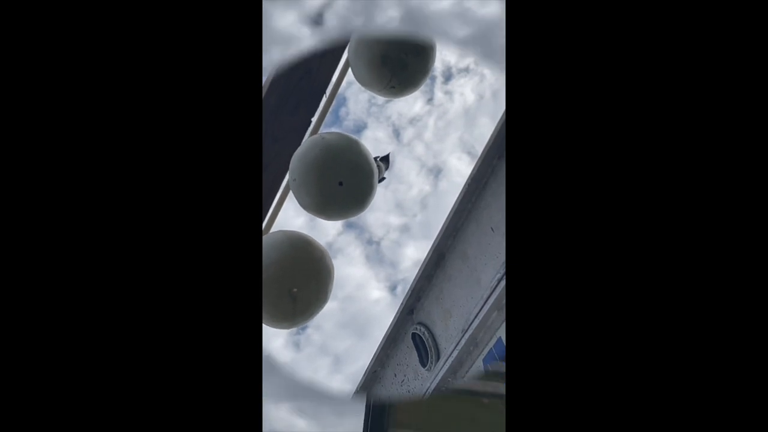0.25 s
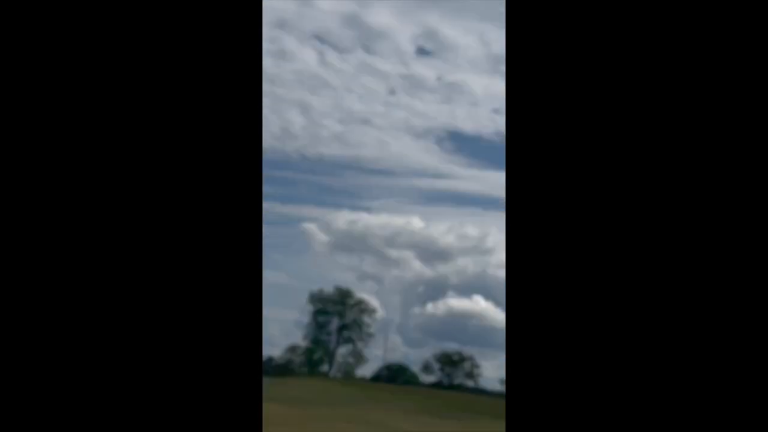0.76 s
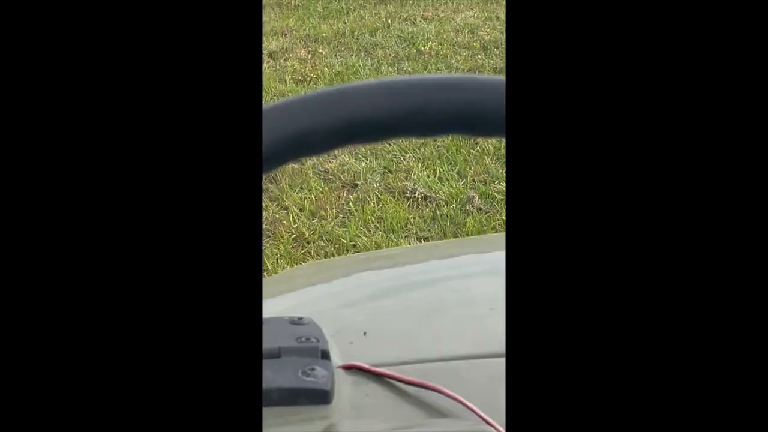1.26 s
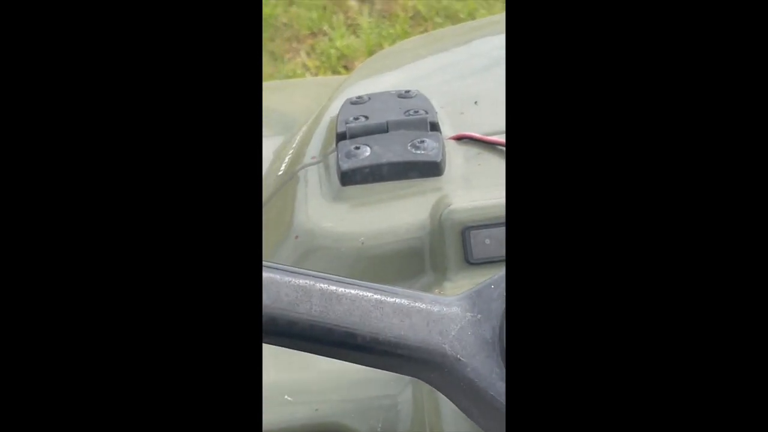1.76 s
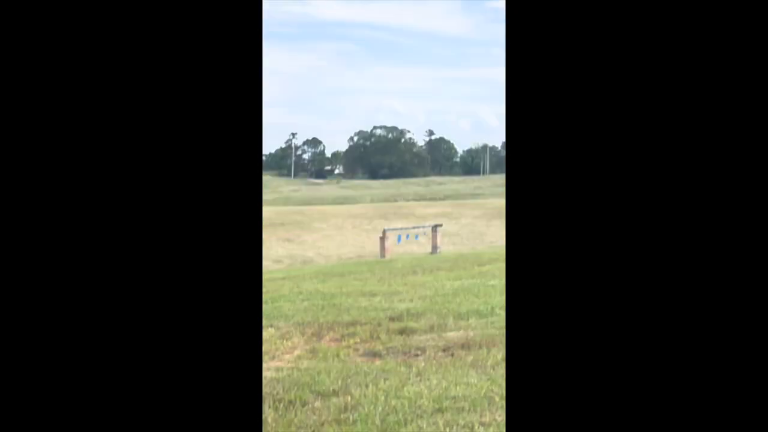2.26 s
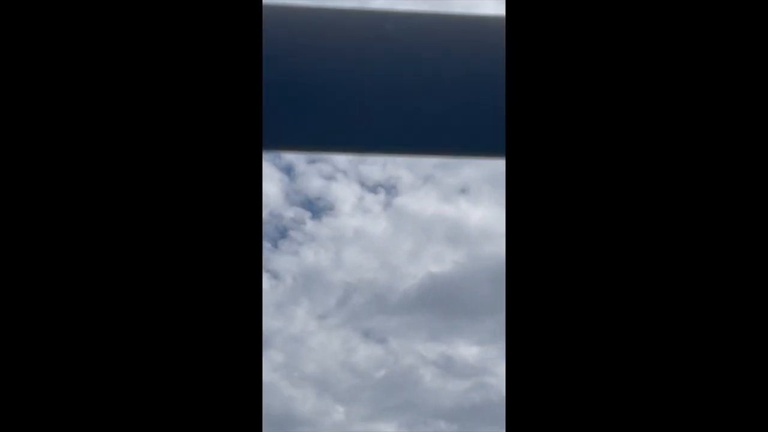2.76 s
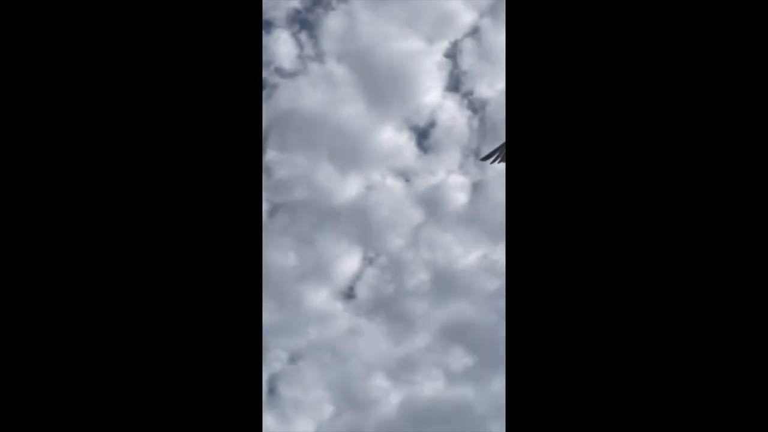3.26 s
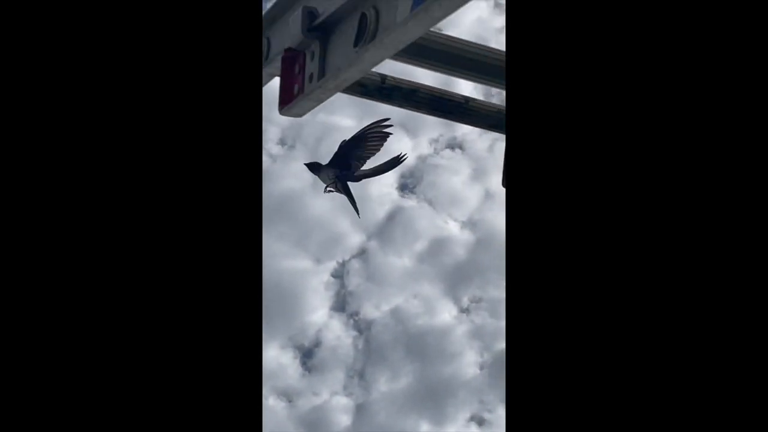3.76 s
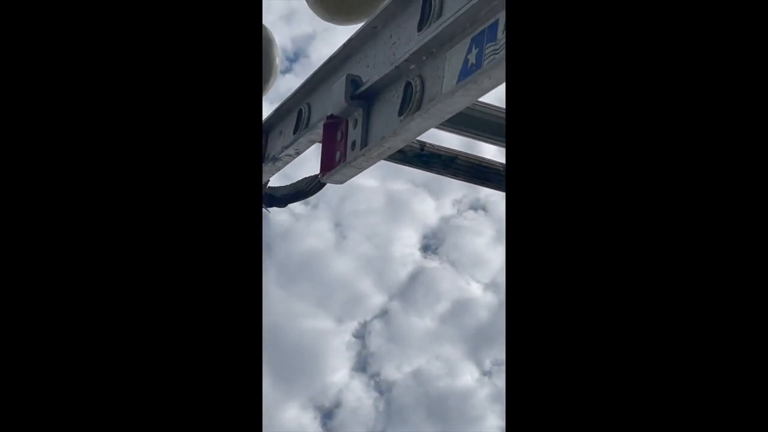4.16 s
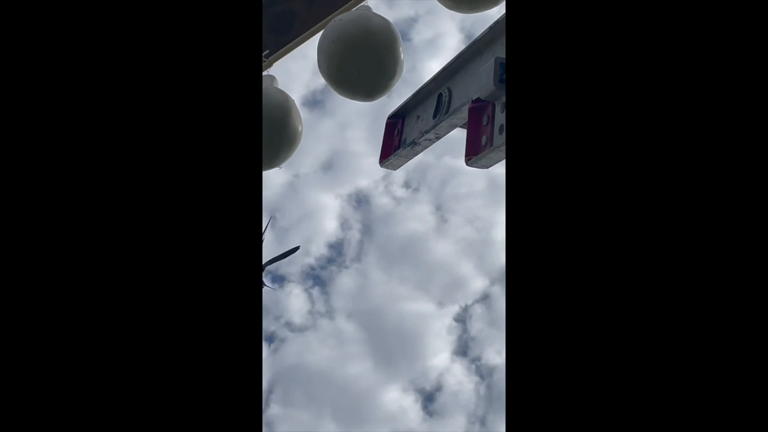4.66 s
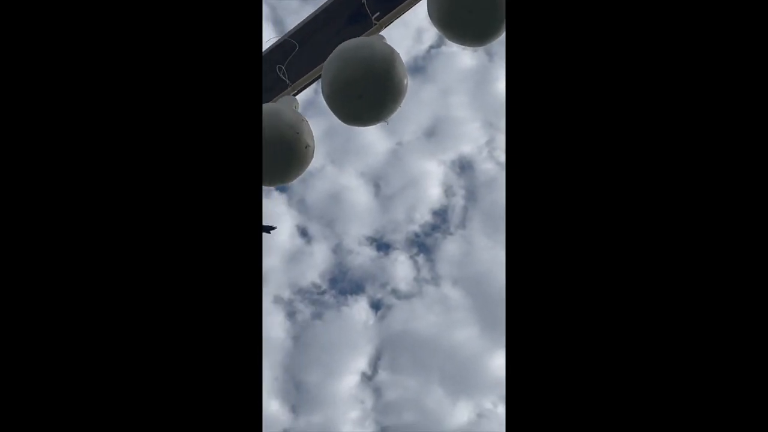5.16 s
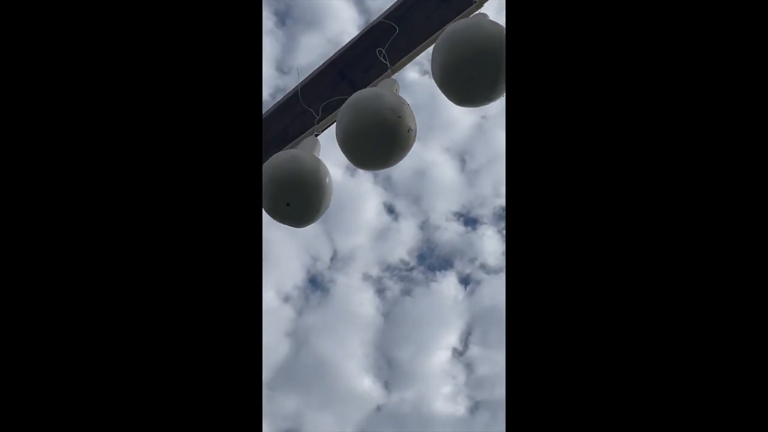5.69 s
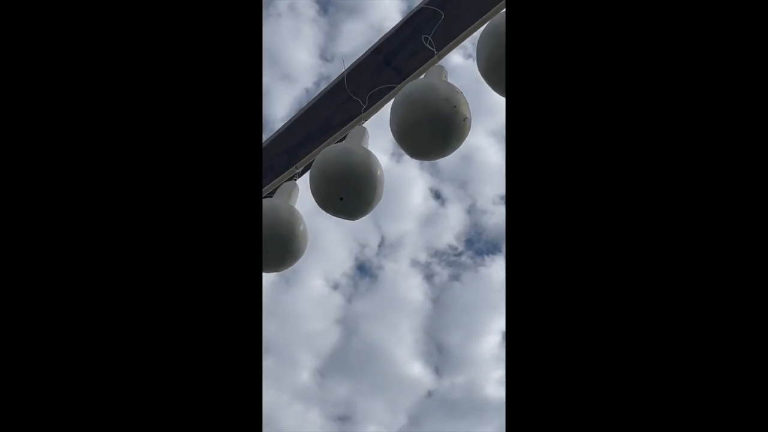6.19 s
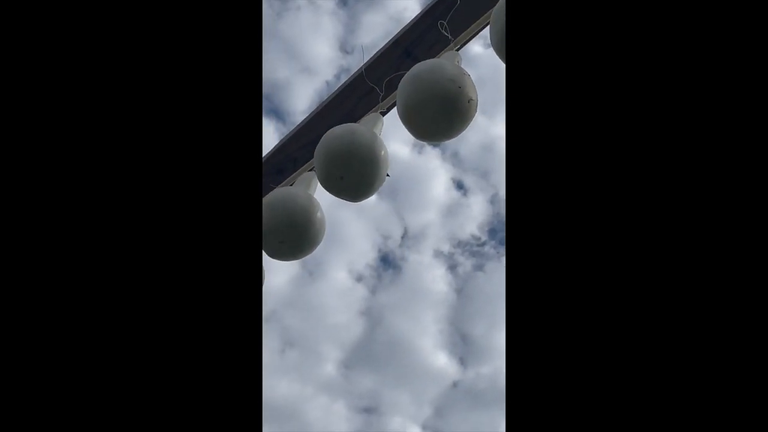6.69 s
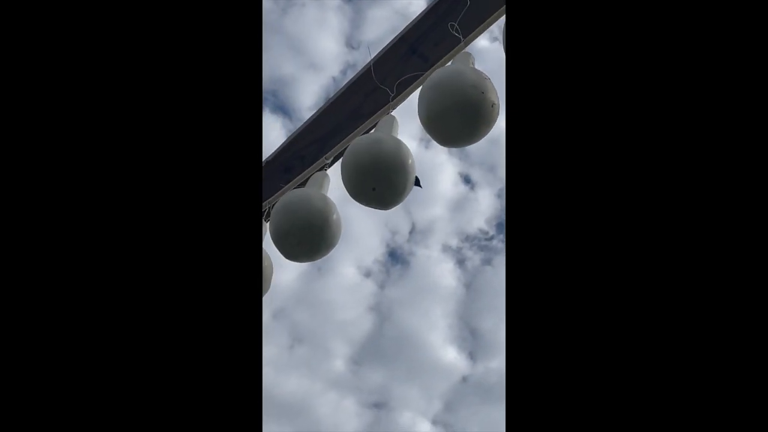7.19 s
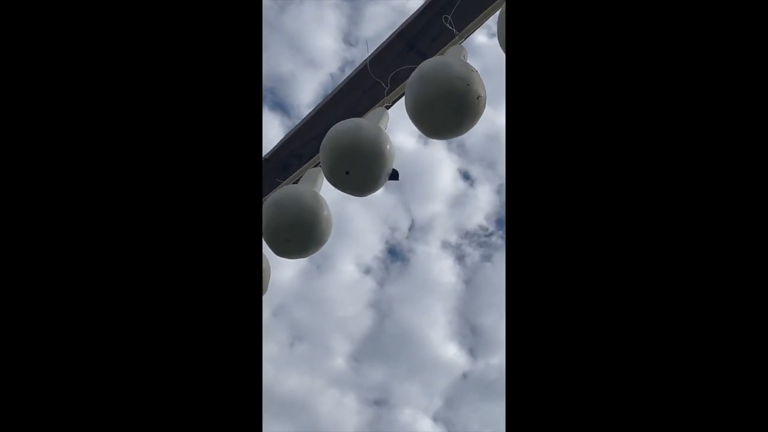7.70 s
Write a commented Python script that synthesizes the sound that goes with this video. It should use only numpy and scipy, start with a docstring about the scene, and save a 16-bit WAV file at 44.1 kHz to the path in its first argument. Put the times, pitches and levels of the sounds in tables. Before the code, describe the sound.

Open grassy field, stereo hand-held phone, purple martins near hanging gourds. Soft air hush and a thin, very high insect buzz continue beneath uneven low wind. Rolling trilled chirps, each about 0.15 s, arch up and fall at 0.0, 0.3, 0.8, 1.8 and a lower one at 2.15; harsher, shorter two-voiced chirps come at 0.7 and 1.6. Wind thumps hard around 0.7 and 2.6. Two loud, close, piercing trilled calls ring out at 2.8 and 4.1, with a faint diffuse echo from trees. A distant engine drones low from about 3.4 to 4.8. Small ticks and dull knocks scatter throughout, busiest 4.6-5.6. From 5.9 to 6.9, four quick falling calls, liquid double notes with descending two-voiced tails, accompany faint far whistles at 5.8-6.4. Birds then mostly stop; wind rumble and flutter swell until the end, with a tiny whistle near 7.8.

```python
"""In an open field, purple martins call around their hanging gourds: arched, trilled chirps, harsh two-voiced
chirps, two loud close calls, then falling two-voiced notes; each is a pair of gliding tones with overtones
or a single one. A far bird whistles thinly, an insect buzzes at a high pitch in the grass and an engine drones
far off, as pure tones, noise bands and wavering sines. Wind buffets a hand-held phone as filtered noise and
single pressure swings, small knocks ring as resonant bursts, and trees return a faint diffuse echo."""
import sys
import numpy as np
from scipy import signal
from scipy.fft import rfft, irfft
from scipy.io import wavfile
from scipy.ndimage import map_coordinates

SR = 44100
rng = np.random.default_rng(int(sys.argv[2]) if len(sys.argv) > 2 else 0)


def materialize(psi):
    """Save the field psi as 16-bit PCM at rate SR to the path in sys.argv[1].

    A 1-D psi becomes a single channel; in a 2-D psi each row is a channel.
    """
    bounded = np.clip(np.atleast_2d(psi).T, -1, 1)
    quanta = np.round(bounded * 32767).astype(np.int16)
    wavfile.write(sys.argv[1], SR, quanta)


N = 350154
TIME = np.arange(N) / SR

# colour of the overtones in chirps and loud calls: hz, gain_db
OVERTONES = [(3500, -0.5), (5200, -9.5), (6200, 1.5), (7600, 4), (9300, -7.5), (11600, 2), (13000, -5),
             (15500, 0.5)]


def undb(db):
    """The decibel is logarithmic: 20 dB is a factor of ten in amplitude."""
    return 10 ** (np.asarray(db) / 20)


def unit(x):
    """Normalisation to unit power: scale to rms 1."""
    return x / np.sqrt(np.mean(x ** 2))


def curve(rows, t=TIME):
    """Linear interpolation in time of each column after the first."""
    s, *columns = np.transpose(rows)
    return [np.interp(t, s, c) for c in columns]


def colour(x, points):
    """Linear filtering: multiply the spectrum by a gain curve through points of hz, gain_db."""
    hz, db = np.transpose(points)
    f = np.fft.rfftfreq(len(x), 1 / SR)
    gain = undb(np.interp(np.log(f + 1), np.log(hz), db))
    return irfft(rfft(x) * gain, len(x))


def walk(rate, size=N):
    """Smooth random wander: a curve with rate random knots a second, spread near 1."""
    place = np.arange(size) * rate / SR
    return map_coordinates(rng.standard_normal(16384), [place], order=2, mode="wrap")


def add(track, start, sound):
    """Superposition: mix a sound into a track at a time in seconds."""
    i = max(int(start * SR), 0)
    track[i:i + len(sound)] += sound[:N - i]


def echo(x, db, rise_s, t60):
    """Diffuse reflection: convolution with noise that builds up, under a decay of 60 dB in t60 seconds."""
    t = TIME[:SR]
    shape = np.clip((t - .002) / rise_s, 0, 1) * undb(-60 * t / t60)
    response = unit(shape) * rng.standard_normal(SR) / np.sqrt(SR)
    return undb(db) * signal.fftconvolve(x, response)[:N]


def arch(start, length, top_hz, rise_hz, fall_hz, db, swell_db, crest, late, attack_s, release_s,
         attack_db=14, release_db=14):
    """Pitch and level contour of a note as rows of s, hz, level_db: rise to a crest, fall and level off."""
    u = np.linspace(0, 1, 128)
    crest = np.clip(crest, .01, .9)
    before = np.maximum(1 - u / crest, 0)
    after = np.maximum((u - crest) / (1 - crest), 0)
    hz = top_hz - rise_hz * before ** 2 - fall_hz * np.sin(np.pi / 2 * after ** late) ** 2
    attack = attack_db * np.maximum(1 - u * length / attack_s, 0) ** 2
    release = release_db * np.maximum(1 - (1 - u) * length / release_s, 0) ** 2
    level_db = db + swell_db * (u - .5) - attack - release
    return np.column_stack([start + u * length, hz, level_db])


def add_trill(track, rows, trill_hz, swing_hz, throb, rough_hz, creak, burst_hz=0, settle_s=0.012, fade_s=0.0012):
    """Frequency and amplitude modulation: one side of the syrinx, a near sine shaken by a fast trill."""
    start, end = rows[0][0], rows[-1][0]
    t = np.arange(start, end, 1 / SR)
    hz, db = curve(rows, t)
    beat = 2 * np.pi * np.cumsum(trill_hz * (1 + 0.025 * walk(46, len(t)))) / SR
    # a burst of extra swing at the start settles
    swing_hz = swing_hz + burst_hz * np.exp((start - t) / settle_s)
    # each beat flicks the pitch up quickly and lets it sink
    hz = hz + swing_hz * (np.sin(beat) + 0.17 * np.sin(2 * beat))
    hz = hz + rough_hz * walk(700, len(t))
    # the tone is weakest near the top of each flick
    depth = np.clip(throb * (1 + 0.23 * walk(110, len(t))), 0, 1)
    pulse = 1 - depth * np.sin(beat + .5)
    # once a beat the membrane rattles briefly, which jitters the phase
    rattle = creak * ((1 - np.sin(beat)) / 2) ** 4 * walk(4500, len(t))
    gate = np.clip(np.minimum(t - start, end - t) / fade_s, 0, 1)
    size = unit(pulse * undb(walk(90, len(t)))) * undb(db) * gate
    phase = 2 * np.pi * np.cumsum(hz) / SR + rattle
    add(track, start, np.sqrt(2) * size * np.exp(1j * phase))


def glides(notes, bend, rough_hz, flicker_db, fade_db=0):
    """Exponential glide: pure notes that change pitch fast at first and then ever more slowly."""
    track = np.zeros(N, complex)
    for start, length, from_hz, to_hz, db in notes:
        u = np.linspace(0, 1, max(int(length * SR), 64))
        progress = (1 - np.exp(-bend * u)) / (1 - np.exp(-bend))
        hz = from_hz + (to_hz - from_hz) * progress + rough_hz * walk(1036, len(u))
        level_db = db - fade_db * (u - .5) + flicker_db * walk(258, len(u))
        swell = np.abs(np.sin(np.pi * u ** 1.2)) ** 0.4 * undb(level_db)
        add(track, start, np.sqrt(2) * swell * np.exp(2j * np.pi * np.cumsum(hz) / SR))
    return track


def throat(tone, resonance, second_db, third_db, fourth_db, rasp_db, blur=.5):
    """Nonlinear distortion: blurred overtones, sum tones where two voices overlap, and a little rasp."""
    size = np.abs(tone)
    turn = np.exp(1j * (np.angle(tone) + blur * walk(900) / 2))
    harmonics = undb(second_db) * turn ** 2 + undb(third_db) * turn ** 3 + undb(fourth_db) * turn ** 4
    overtones = size * harmonics.real
    rasp = unit(colour(rng.standard_normal(N), [(800, -22), (2000, -3.5), (3000, 10.0), (4600, -12),
                                                (6500, 0), (12000, -2.0), (15500, -22.5)]))
    return tone.real + colour(overtones + undb(rasp_db) * size * rasp, resonance)


def field(trim_db=3):
    """Broadband turbulence noise: the soft, wide hush of air over grass and distant trees."""
    # spectrum: hz, relative_db
    field_spectrum = [(150, -14), (300, -0.5), (540, -4.5), (820, -4.5), (1700, -9), (3700, -16),
                      (5500, -27), (7500, -37.5), (12000, -51), (15500, -38.5)]
    # level before the trim: s, level_db
    field_level = [(.1, -69.5), (.85, -59.5), (1.4, -64.5), (2.0, -65), (2.3, -61.5), (2.7, -64.5),
                   (3.05, -62), (4.0, -66.5), (6.2, -67), (7.94, -67)]
    # stereo width, side against mid: hz, gain_db
    field_side = [(250, -13), (520, -3), (1000, -5.5), (3000, -11.5), (8000, -12.5)]
    level_db, = curve(field_level)
    mid, side = (unit(colour(rng.standard_normal(N), field_spectrum)) * undb(1.0 * walk(7.8))
                 for _ in range(2))
    return undb(level_db + trim_db) * (mid + colour(side, field_side) * np.array([[1], [-1]]))


def drone():
    """Line spectrum: low sines of an engine far away, wavering in pitch and level."""
    # level of the engine: s, level_db
    drone_level = [(3.2, -70.5), (3.45, -56.5), (3.85, -48.5), (4.2, -46), (4.45, -55.5), (4.8, -59.5),
                   (5.1, -77)]
    # its spectral lines: hz, relative_db
    drone_lines = [(91.5, -1), (220, -12), (240, -19)]
    level_db, = curve(drone_level)
    lines = np.zeros(N)
    for hz, db in drone_lines:
        phase = 2 * np.pi * np.cumsum(hz * (1 + 0.016 * walk(4.5))) / SR
        lines += undb(db + 2 * walk(1.8)) * np.sin(phase)
    return np.sqrt(2) * undb(level_db) * lines


def insect(trim_db=1, stroke_width=0.23, stroke_hz=66.2):
    """Stridulation: each wing stroke drags a scraper over a file, and the buzz climbs through the stroke."""
    # spectral weighting of the buzz: hz, gain_db
    insect_spectrum = [(6800, -36), (8300, 1), (9100, -6.5), (9700, -4.5), (10300, -7), (10950, -4.5),
                       (11350, -24), (12000, -30.5)]
    # level before the trim: s, level_db
    insect_level = [(.3, -69), (.65, -63), (1.2, -66.5), (3.5, -65), (4.0, -67), (7.94, -67)]
    level_db, = curve(insect_level)
    stroke = np.cumsum(stroke_hz * (1 + .008 * walk(10))) / SR
    buzz = np.zeros(N)
    # three noise bands peak in turn, each at its fraction of the stroke
    for hz, moment in [(9250, .25), (10250, 0.51), (10900, 0.6)]:
        ring = unit(colour(rng.standard_normal(N), [(hz - 1200, -30), (hz, 0), (hz + 1200, -30)]))
        turn = 2 * np.pi * (stroke - moment)
        buzz += ring * np.exp((np.cos(turn) - 1) / (2 * np.pi * stroke_width) ** 2)
    return unit(colour(buzz, insect_spectrum)) * undb(level_db + trim_db)


def eddy(hz, cycles=1.23, sink=0.11):
    """Vortex passage: the port feels a pressure swing of a cycle or two that sinks in pitch."""
    turns = TIME[:8192] * hz
    age = turns / cycles
    envelope = (2 * age) ** 2 * np.exp(2 - 4 * age)
    return envelope * np.sin(2 * np.pi * turns * (1 + sink) / (1 + sink * np.sqrt(age)))


def wind(rumble_trim_db=1.5, flutter_trim_db=-3.5, patchy_db=4.5, lumpy_db=1.5, eddy_db=3, eddy_hz=260,
         spread_db=3, eddy_count=110, gust_flutter_db=-24.5):
    """Turbulent pressure: deep rumble and patchy flutter swell in gusts, under small eddies and strong buffets."""
    # steady breeze before the trims: s, rumble_db, flutter_db
    breeze = [(0, -52.5, -57), (1.05, -47, -54.5), (1.5, -52, -63), (2.2, -46.5, -52.5), (3.0, -56, -53.5),
              (3.3, -55.5, -51.5), (3.65, -56, -47), (4.3, -48, -55), (4.65, -59, -59.5), (5.0, -58, -58),
              (5.45, -46, -55.5), (6.0, -54, -57.5), (6.17, -44.5, -46.5), (7.0, -40.5, -46),
              (7.7, -37.5, -41.5), (7.94, -46.5, -52)]
    # gusts, each a single swell: peak_s, length_s, rumble_db
    gusts = [(0.66, 0.14, -34.5), (2.325, 0.19, -39), (2.59, 0.23, -32), (2.821, 0.066, -40),
             (4.915, 0.033, -41.5), (5.254, 0.23, -42.5), (5.703, 0.31, -38), (6.598, 0.21, -38)]
    # the strongest buffets: start_s, level_db, pitch_hz
    buffets = [(0.676, -19.5, 73), (2.308, -35.5, 483), (2.324, -35.5, 387), (2.571, -21, 72),
               (2.656, -27, 159), (3.098, -32.5, 102), (3.215, -35, 100), (5.159, -31, 81),
               (5.221, -25, 102.5), (5.357, -26.5, 92), (5.642, -23.5, 53), (6.508, -28, 201),
               (6.625, -31.5, 294), (6.954, -33, 318), (7.098, -28.5, 302), (7.177, -28.5, 312),
               (7.329, -23.5, 111.4), (7.36, -29, 265), (7.538, -24, 208), (7.821, -19.5, 235)]
    # spectra of the large and the small turbulence: hz, relative_db
    rumble_spectrum = [(12, -42.5), (20, -9), (44, 2), (73, 3), (93, 2.5), (150, -6), (255, -23.5),
                       (400, -37), (520, -54), (880, -120)]
    flutter_spectrum = [(100, -18.5), (170, -2.5), (240, 1.5), (330, -7.5), (480, -22), (700, -35),
                        (1200, -75)]
    # stereo width, side against mid: hz, gain_db
    wind_side = [(30, -7.5), (70, -20), (140, -20.5), (300, -13.5)]

    rumble_db, flutter_db = curve(breeze)
    gust = sum(undb(db) * np.exp(-(2 * (TIME - s) / length) ** 2) for s, length, db in gusts)
    rumble = np.hypot(undb(rumble_db + rumble_trim_db), gust) * undb(lumpy_db * walk(22))
    # a gust brings flutter in proportion to its rumble
    flutter = np.hypot(undb(flutter_db + flutter_trim_db), gust * undb(gust_flutter_db))

    def turbulence():
        """Superposed scales of turbulence: one channel of rumble and flutter noise."""
        deep = unit(colour(rng.standard_normal(N), rumble_spectrum))
        patchy = rng.standard_normal(N) * undb(patchy_db * walk(70))
        return rumble * deep + flutter * unit(colour(patchy, flutter_spectrum))

    mid, side = turbulence(), turbulence()
    places = rng.integers(0, N, eddy_count)
    for i, (size, octaves) in zip(places, rng.standard_normal((eddy_count, 2))):
        level = flutter[i] * undb(eddy_db + spread_db * size)
        add(mid, i / SR, level * eddy(eddy_hz * 2 ** (.4 * octaves)))
    for start, db, hz in buffets:
        add(mid, start, undb(db) * eddy(hz))
    return mid + colour(side, wind_side) * np.array([[1], [-1]])


def knocks():
    """Damped resonance: brief decaying noise bursts excite one broad mode each."""
    # small knocks and ticks: start_s, peak_db, ring_hz, width_hz, t60_s
    knock_rows = [(1.185, -47, 3500, 5070, 0.0067), (2.758, -41.5, 3250, 3000, 0.014),
                  (3.359, -41.5, 1000, 1202, 0.054), (4.093, -40, 3030, 1516, 0.038),
                  (4.565, -48, 680, 297, 0.032), (4.689, -54, 2900, 403, 0.016),
                  (4.794, -39.5, 2530, 7200, 0.092), (4.798, -37.5, 250, 70.9, 0.17),
                  (5.201, -40.5, 570, 90, 0.046), (5.203, -51, 1305, 890, 0.039),
                  (5.283, -49, 580, 130, 0.07), (5.364, -40, 2060, 294, 0.061),
                  (5.565, -47.5, 3440, 5090, 0.11), (5.597, -46, 4300, 5010, 0.09),
                  (6.738, -50, 2320, 1470, 0.017), (7.852, -51.5, 3300, 2510, 0.045)]
    track, t = np.zeros(N), TIME[:8192]
    for start, db, hz, width_hz, t60 in knock_rows:
        burst = rng.standard_normal(len(t)) * undb(-60 * t / t60)
        ring = signal.lfilter(*signal.iirpeak(hz, hz / min(width_hz, SR / 4), fs=SR), burst)
        # low-pass above the resonance
        ring = signal.lfilter(*signal.butter(2, min(1.4 * hz, SR / 3), fs=SR), ring)
        add(track, start, undb(db) * ring / np.abs(ring).max())
    return track


def far_whistles():
    """Pure tones: thin gliding whistles of a bird far off, without overtones."""
    # whistles: start_s, length_s, from_hz, to_hz, level_db
    whistles = [(5.84, 0.038, 4050, 4100, -72.5), (6.198, 0.17, 4300, 4215, -65.5),
                (6.39, 0.042, 4400, 4350, -72.5), (7.77, 0.02, 2600, 2235, -64.5)]
    return glides(whistles, bend=0.74, rough_hz=12, flicker_db=3.5).real


def falling_calls(low_db=4.5, last_db=-8, last_hz=2080):
    """Two sources in one syrinx: one side sweeps down in two notes, then dips and lifts under the other's tail."""
    # falling calls, a sweep, a second note and a two-voiced tail: start_s, sweep_s, from_hz, to_hz,
    # sweep_db, second_s, second_db, tail_s, tail_db, lag_s of the tail's low note
    falling = [(5.89, 0.07, 5620, 2630, -63.5, 0.021, -49, 0.15, -65, 0.097),
               (6.238, 0.022, 3230, 2676, -47, .024, -39, 0.1, -55, .024),
               (6.509, .034, 3565, 2610, -38.5, 0.024, -38.5, 0.079, -54, 0.015),
               (6.76, .026, 4390, 3230, -43, .030, -38.5, 0.12, -46.5, 0.018)]
    # short notes that announce a falling call: start_s, level_db
    pickups = [(6.213, -53), (6.487, -43.5)]
    # mellow overtone resonance: hz, gain_db
    mellow = [(2000, -2), (3600, 6.5), (4200, -9), (5000, 8.5), (6000, 1), (7000, -17), (9500, -31),
              (12500, -11), (15500, 12)]
    pickup_s, pickup_from_hz, pickup_to_hz = .022, 3500, 2730
    gap_s = 0.0012  # between a sweep and its second note
    step_hz, landing_hz = 221, 2074  # the second note starts a step below the sweep's end and lands here
    overlap_s = 0.0058  # of the tail with the second note
    held_from_hz, held_to_hz = 3240, 2340
    low_from_hz, low_to_hz, low_s = 2250, 1842, .046

    sweeps = [(start, pickup_s, pickup_from_hz, pickup_to_hz, db) for start, db in pickups]
    held, lows = [], []
    for start, sweep_s, from_hz, to_hz, sweep_db, second_s, second_db, tail_s, tail_db, lag_s in falling:
        second = start + sweep_s
        tail = second + second_s - overlap_s
        low = tail + lag_s
        sweeps.append((start, sweep_s - gap_s, from_hz, to_hz, sweep_db))
        sweeps.append((second, second_s, to_hz - step_hz, landing_hz, second_db))
        held.append((tail, tail_s, held_from_hz, held_to_hz, tail_db))
        lows.append((low, low_s, low_from_hz, low_to_hz, tail_db + low_db))
        # the low voice lifts to a last note of steady pitch
        lows.append((low + low_s, tail_s - lag_s - low_s, last_hz, last_hz, tail_db + last_db))
    tone = glides(sweeps, bend=1.1, rough_hz=30, flicker_db=3.5)
    tone += glides(held, bend=4.2, rough_hz=45, flicker_db=4, fade_db=9.5)
    tone += glides(lows, bend=1.6, rough_hz=35, flicker_db=3.0, fade_db=3.0)
    # the strong second harmonic is heard as a clear octave
    return throat(tone, mellow, second_db=-16.0, third_db=-31, fourth_db=-28, rasp_db=-18.5, blur=.2)


def harsh_chirps(lag_s=0.023, overhang_s=0.0081):
    """Beating of two voices: the lower enters later, takes over and outlasts the upper."""
    # harsh chirps: start_s, length_s, upper_hz, upper_fall_hz, upper_db, lower_hz, lower_fall_hz, lower_db
    harsh = [(.683, 0.087, 4120, 404, -36.5, 3350, 520, -40.5),
             (1.602, 0.087, 4110, 99, -36.5, 3560, 786, -37.5)]
    tone = np.zeros(N, complex)
    for start, length, upper_hz, upper_fall_hz, upper_db, lower_hz, lower_fall_hz, lower_db in harsh:
        upper = arch(start, length, upper_hz, 216, upper_fall_hz, upper_db, swell_db=-3.0,
                     crest=0.252, late=1.41, attack_s=0.037, release_s=0.028)
        lower = arch(start + lag_s, length - lag_s + overhang_s, lower_hz, 0, lower_fall_hz, lower_db,
                     swell_db=19.5, crest=0.045, late=1.0, attack_s=0.0042, release_s=0.029)
        add_trill(tone, upper, trill_hz=162.7, swing_hz=152, throb=0.46, rough_hz=65, creak=0.025)
        add_trill(tone, lower, trill_hz=175.7, swing_hz=110, throb=0.16, rough_hz=77.5, creak=0.064)
    return throat(tone, OVERTONES, second_db=-27.5, third_db=-24.5, fourth_db=-35, rasp_db=-18.5)


def chirps(from_hz=2850, flick_db=-15, flick_s=.011):
    """Frequency-modulated arches: trilled chirps from the gourds, each led in by a soft upward flick."""
    # chirps: start_s, length_s, top_hz, rise_hz, fall_hz, late (exponent delaying the fall), level_db,
    # swell_db, trill_hz, swing_hz, throb (0-1), lead_s of the flick, flick_hz it reaches
    chirp_rows = [(.010, 0.15, 3594, 520, 875, 1.48, -42, 15.5, 163.3, 180, 0.32, 0.0016, 3060),
                  (0.313, .155, 3628, 233, 883, 1.23, -34.5, 9, 180.5, 133, .4, .019, 3050),
                  (0.826, 0.17, 3544, 96, 776, 1.58, -31.5, -1, 170, 124, 0.4, .005, 4000),
                  (1.772, 0.15, 3590, 254, 768, 1.9, -35, 4, 162.3, 115, 0.5, .009, 3820),
                  (2.155, 0.15, 3230, 69.8, 640, 2.44, -32.5, 4.5, 178, 140, 0.13, .004, 2960)]
    tone = np.zeros(N, complex)
    for (start, length, top_hz, rise_hz, fall_hz, late, db, swell_db,
         trill_hz, swing_hz, throb, lead_s, flick_hz) in chirp_rows:
        flick = (start - lead_s, flick_s, from_hz, flick_hz, db + flick_db)
        tone += glides([flick], bend=0.63, rough_hz=90, flicker_db=4)
        note = arch(start, length, top_hz, rise_hz, fall_hz, db, swell_db, crest=.33, late=late,
                    attack_s=.016, release_s=0.032, attack_db=12)
        add_trill(tone, note, trill_hz, swing_hz, throb, rough_hz=36, creak=.025, burst_hz=240)
    return throat(tone, OVERTONES, second_db=-28.0, third_db=-27.5, fourth_db=-51, rasp_db=-39.5, blur=0.37)


def loud_calls(sum_db=-8, lag_s=.031, lower_hz=3040, lower_fall_hz=503):
    """Intermodulation: close calls with a slower, wider trill over a weak pulsing second voice."""
    # loud calls in flight: start_s, length_s, top_hz, fall_hz, level_db, swell_db, trill_hz, lower_db
    loud = [(2.772, 0.12, 3896, 372, -20, 0, 137.6, -45), (4.109, 0.12, 3999, 452, -17.5, -4, 137.8, -40)]
    main, second = np.zeros((2, N), complex)
    for start, length, top_hz, fall_hz, db, swell_db, trill_hz, lower_db in loud:
        upper = arch(start, length, top_hz, 140, fall_hz, db, swell_db, crest=0.18, late=0.92,
                     attack_s=.07, release_s=.055, attack_db=9, release_db=10.5)
        lower = arch(start + lag_s, length - lag_s, lower_hz, 0, lower_fall_hz, lower_db,
                     swell_db=10.5, crest=0.025, late=0.99, attack_s=.015, release_s=0.015)
        add_trill(main, upper, trill_hz, swing_hz=185, throb=0.28, rough_hz=35, creak=0.066, burst_hz=200)
        add_trill(second, lower, trill_hz, swing_hz=200, throb=0.89, rough_hz=100, creak=0.11)
    # the two voices modulate each other, which gives a tone at the sum of their pitches
    sum_tone = undb(sum_db) * (second * np.exp(1j * np.angle(main))).real
    call = throat(main + second, OVERTONES, second_db=-31.5, third_db=-29.0, fourth_db=-30.5,
                  rasp_db=-31, blur=0.97)
    # the short windpipe and open beak radiate less below 2.5 kHz
    return colour(call + sum_tone, [(1000, -5.5), (1900, -4.5), (2500, 0)])


def scene(close_db=-11.5):
    """Superposition of sources: martins in the open, with insect, knocks, wind, engine and background."""
    background = field() + drone() + insect() + wind() + knocks()
    perched = far_whistles() + falling_calls() + harsh_chirps() + chirps()
    close = loud_calls()
    # short scatter off the rack and ladder
    birds = perched + close + echo(perched + close, db=-8.0, rise_s=0.00084, t60=0.054)
    # birds close to the phone send less to the trees than their loudness suggests
    to_trees = perched + undb(close_db) * close
    trees = np.array([echo(to_trees, db=-29, rise_s=.22, t60=.85) for _ in range(2)])
    return background + birds + trees


def ports(stereo):
    """Interchannel phase: the two microphone ports differ unevenly with pitch, and strongly in the treble."""
    # phase by which the phone's left port leads the right: hz, phase_rad
    port_phase = [(1800, 0), (2600, .85), (3500, .7), (4500, .85), (5000, .05), (5500, .15), (6000, 1.3),
                  (7000, 2.7), (8000, 3.4), (10600, 6.15), (11400, 6.35), (12500, 7.3), (13300, 9),
                  (14500, 9.5), (15800, 10.5)]
    phase = np.interp(np.fft.rfftfreq(N, 1 / SR), *np.transpose(port_phase))
    return irfft(rfft(stereo) * np.exp(.5j * phase * np.array([[1], [-1]])), N)


def record(dry, bass_hz=38, top_hz=15850):
    """Band limiting: the phone's ports shift the phase, and it cuts the deepest bass and the top."""
    sound = signal.sosfilt(signal.butter(5, bass_hz, "high", fs=SR, output="sos"), ports(dry))
    return signal.sosfilt(signal.ellip(8, .2, 80, top_hz, fs=SR, output="sos"), sound)


dry = scene()
out = record(dry)
materialize(out)
```